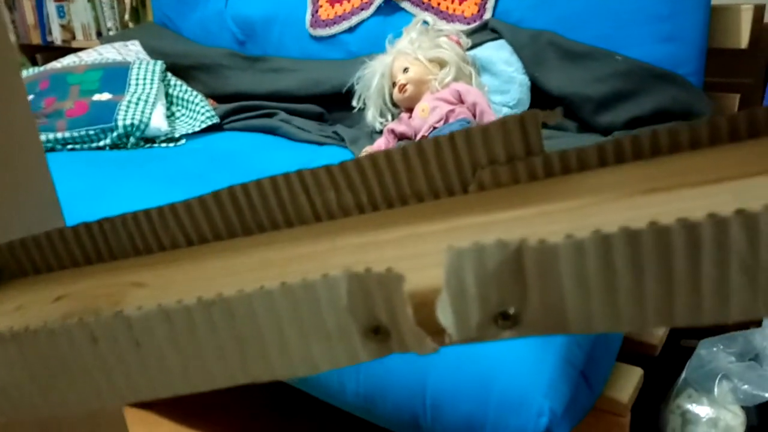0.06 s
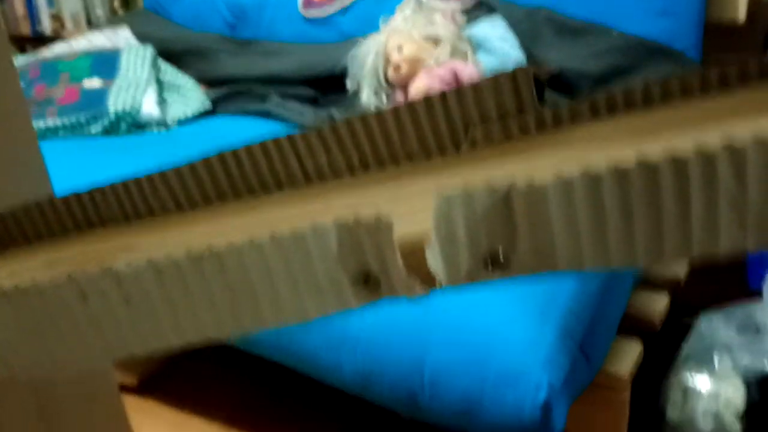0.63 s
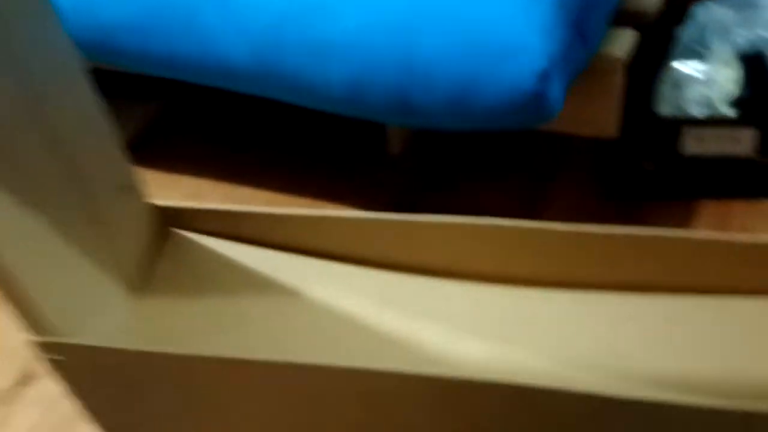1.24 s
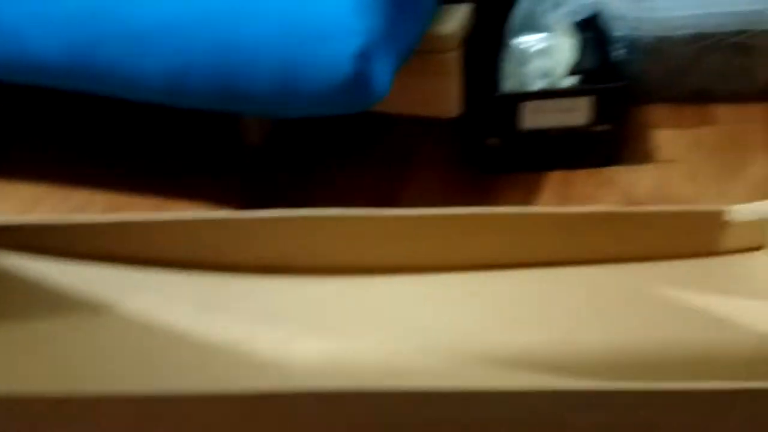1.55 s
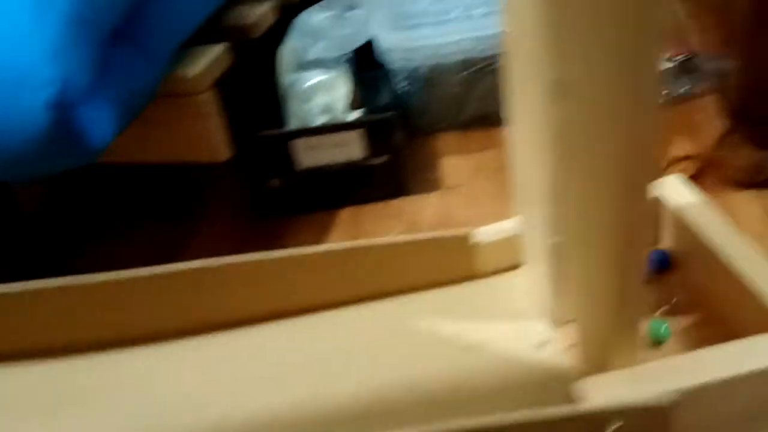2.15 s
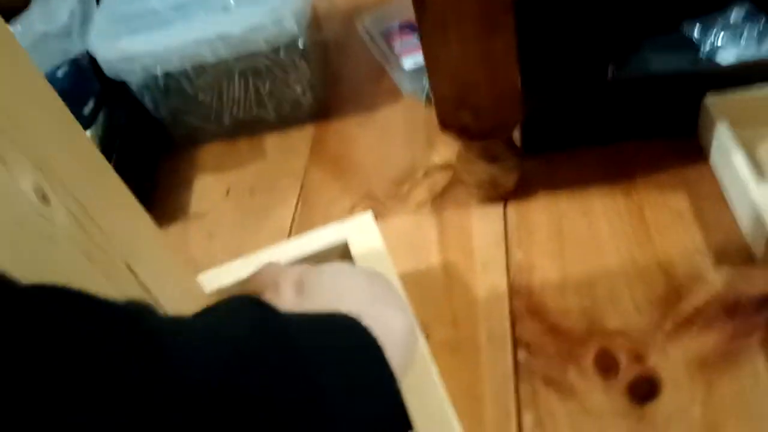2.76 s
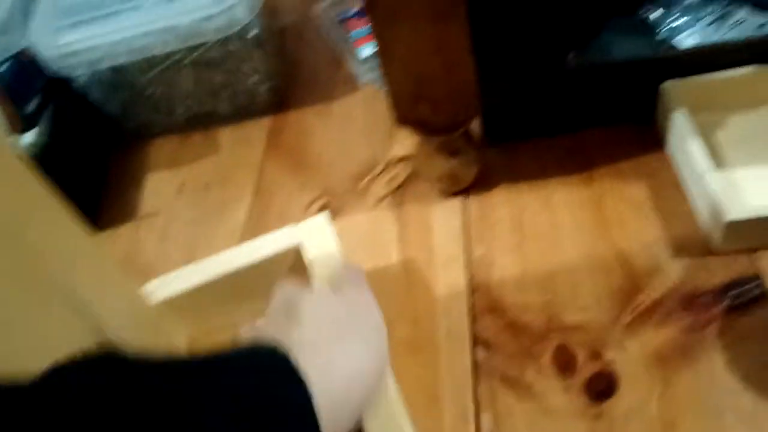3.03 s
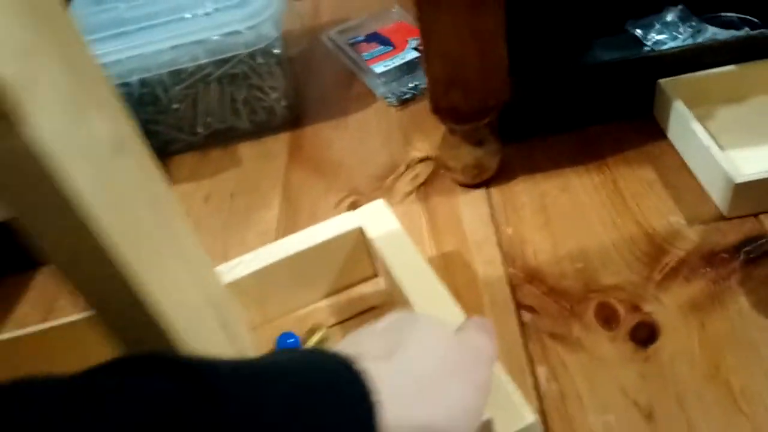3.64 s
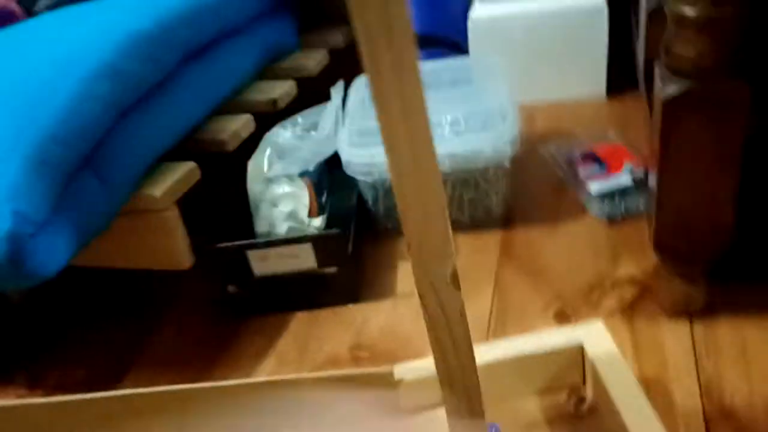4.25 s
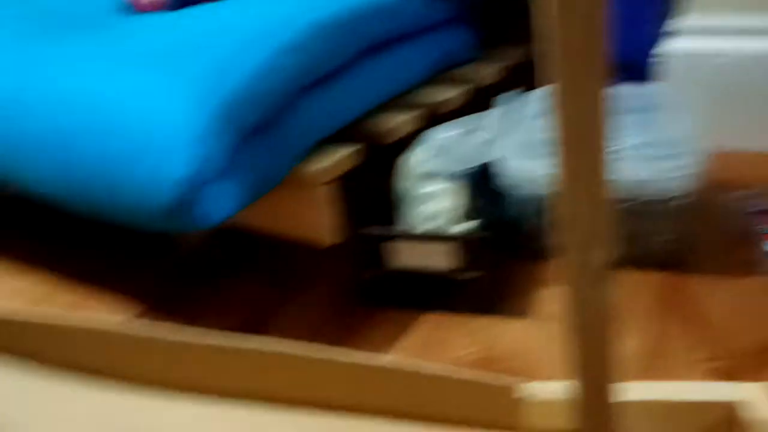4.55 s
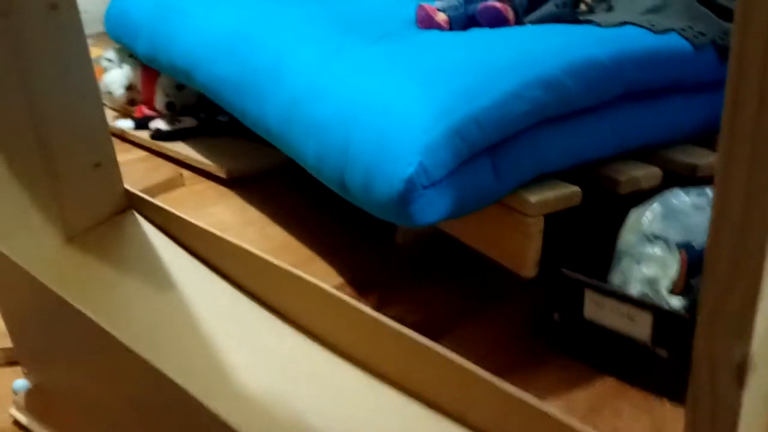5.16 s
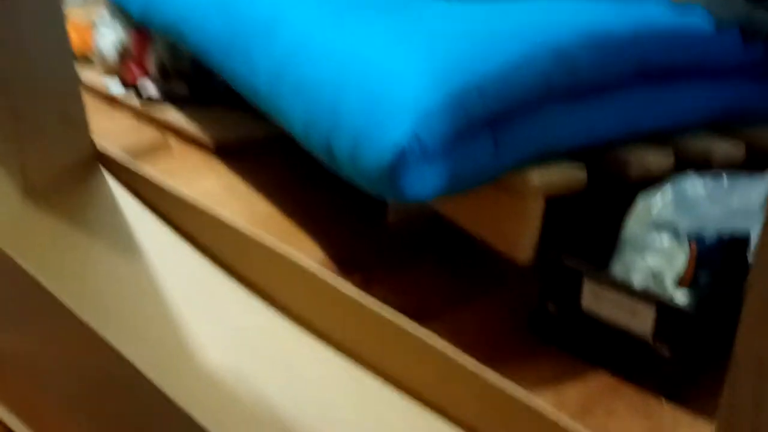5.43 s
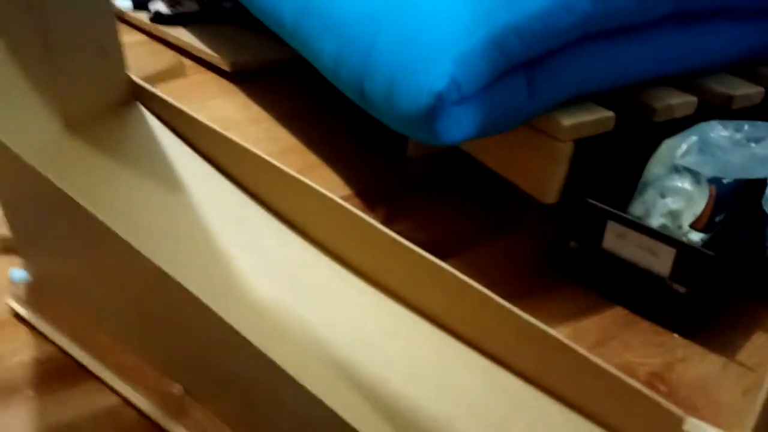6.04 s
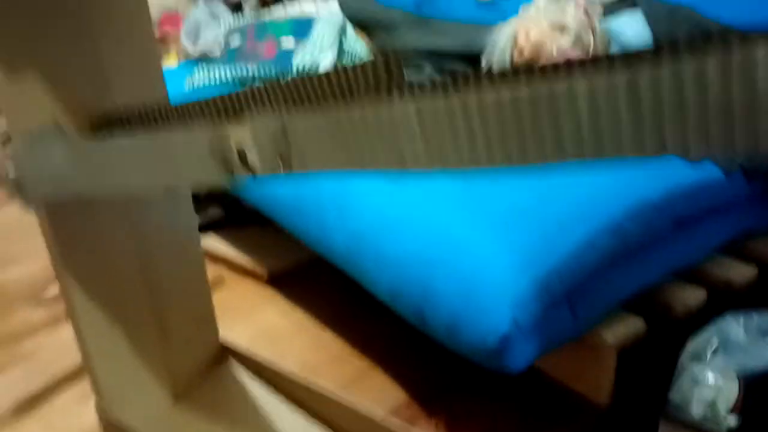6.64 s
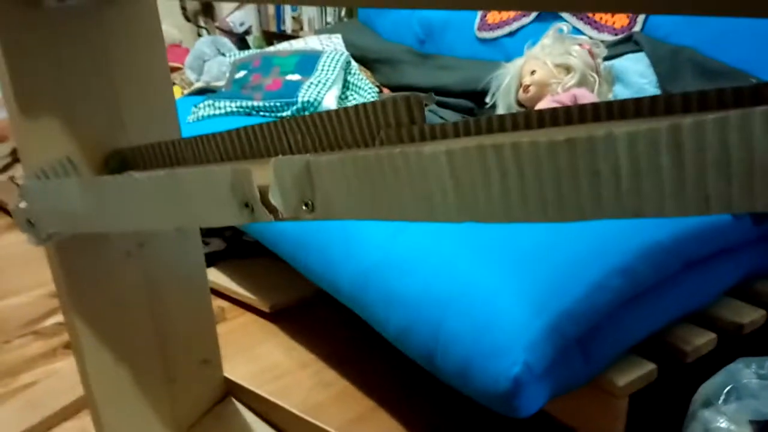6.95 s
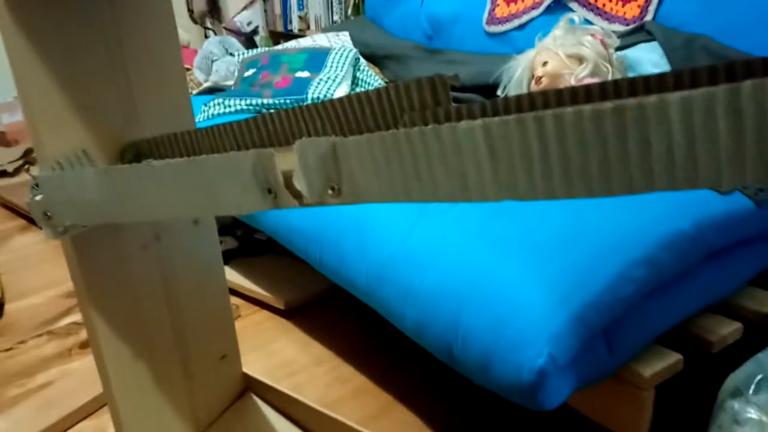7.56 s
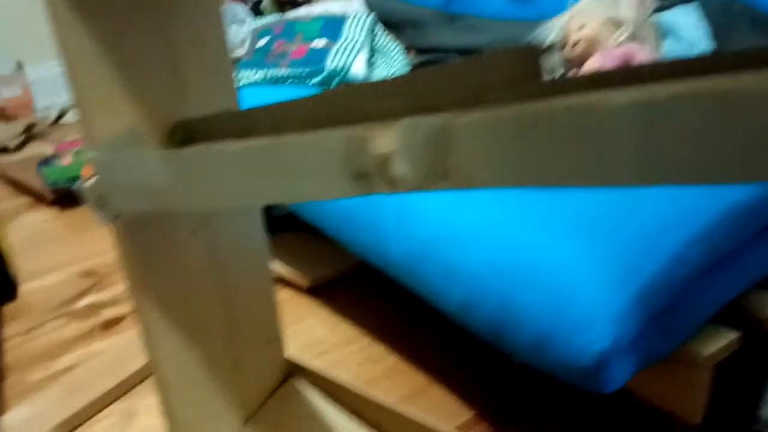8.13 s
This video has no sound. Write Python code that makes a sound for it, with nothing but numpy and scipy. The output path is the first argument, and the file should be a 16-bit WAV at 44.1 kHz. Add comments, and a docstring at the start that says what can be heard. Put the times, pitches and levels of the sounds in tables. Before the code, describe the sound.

Marbles rattle along wooden and cardboard tracks in a small room, click together as a hand gathers them, and roll once more.

```python
"""Glass marbles roll down a home-made run of boards and corrugated cardboard in a small room.
Bumps and knocks ring the wood's resonances; glass on glass clicks. As a clatter's hiss dies away, the
marbles rattle along the ramp and drop into a wooden tray, where a sleeved hand scrabbles them together.
Carried up with light taps and swishes of cloth, they are set on the top track, roll off and tumble
over its end. Jolts boom in the frame and floor; something hums low in the room."""
import sys
import numpy as np
from scipy import signal
from scipy.fft import rfft, irfft
from scipy.io import wavfile
from scipy.ndimage import map_coordinates

SR = 44100
rng = np.random.default_rng(int(sys.argv[2]) if len(sys.argv) > 2 else 0)


def dump(signal):
    """Clip the signal to [-1, 1] and save it as 16-bit WAV at the path in sys.argv[1]."""
    limited = np.clip(np.atleast_2d(signal).T, -1, 1)
    pcm = np.round(limited * 32767).astype(np.int16)
    wavfile.write(sys.argv[1], SR, pcm)


N = 369999
TIME = np.arange(N) / SR


def from_db(db):
    return 10 ** (np.asarray(db) / 20)


def unit_rms(x):
    return x / np.sqrt(np.mean(x ** 2) + 1e-20)


def band(x, low_hz, high_hz, order=2):
    """Causal band-pass."""
    sos = signal.butter(order, [low_hz, min(high_hz, .45 * SR)], "band", fs=SR, output="sos")
    return signal.sosfilt(sos, x)


def colour(x, points, size=4096):
    """Minimum-phase filter through (frequency [Hz], gain [dB]) points."""
    hz, db = np.transpose(points)
    grid_hz = np.maximum(np.fft.rfftfreq(size, 1 / SR), 1)
    gain = from_db(np.interp(np.log(grid_hz), np.log(hz), db))
    cepstrum = irfft(np.log(gain))
    cepstrum[1:size // 2] *= 2
    cepstrum[size // 2 + 1:] = 0
    response = irfft(np.exp(rfft(cepstrum)))
    return signal.oaconvolve(np.atleast_2d(x), response[None], axes=1)[:, :x.shape[-1]]


def wide_noise(size, apart_hz=750):
    """Stereo noise, alike in the bass, unrelated in the treble."""
    mid, side = rng.standard_normal((2, size))
    side = signal.sosfilt(signal.butter(1, apart_hz, "high", fs=SR, output="sos"), side)
    return unit_rms(mid + side * [[1], [-1]])


def add(out, time_s, sound):
    start = max(round(time_s * SR), 0)
    out[:, start:start + sound.shape[1]] += sound[:, :N - start]


def envelopes(curve, fade_s=.004):
    """One gain per dB column, over the curve's span, with faded ends."""
    times_s, *columns_db = np.transpose(curve)
    t = np.arange(times_s[0], times_s[-1], 1 / SR)
    fade = np.clip(np.minimum(t - t[0], t[-1] - t) / fade_s, 0, 1)
    return [fade * from_db(np.interp(t, times_s, db)) for db in columns_db]


def fluttering_noise(curve, shape, flutter_db, gain_db):
    """Coloured noise whose level flutters about a curve."""
    gain, = envelopes(curve)
    flutter = unit_rms(band(rng.standard_normal(len(gain)), 3.5, 70))
    noise = colour(wide_noise(len(gain)), shape) * from_db(flutter_db * flutter)
    out = np.zeros((2, N))
    add(out, curve[0][0], gain * unit_rms(noise))
    return from_db(gain_db) * out


# (time [s], level [dB]); table levels throughout are before each source's gain_db
CLATTER_TAIL_LEVELS = [(0, -27.5), (.05, -36.5), (.12, -49), (.3, -83)]
# (frequency [Hz], gain [dB])
CLATTER_TAIL_COLOUR = [(800, 0.5), (2000, 2.5), (5500, 4.5), (7000, -9.5), (10000, -13), (15000, -34)]


def clatter_tail():
    """The bright hiss of a clatter dies away as the roll begins."""
    return fluttering_noise(CLATTER_TAIL_LEVELS, CLATTER_TAIL_COLOUR, flutter_db=-0.7, gain_db=5.0)


# (frequency [Hz], level [dB])
HUM_TONES = [(118.4, -54.5), (209.9, -58)]
# background noise, with a faint rubbing whistle near 4.4 kHz: (frequency [Hz], gain [dB])
ROOM_COLOUR = [(15, -42.5), (25, -28.5), (87, -15.5), (102, -11.5), (123, -5.5), (149, -13.5), (217, -17),
               (242, -20), (416, -33.5), (677, -41), (3250, -44.5), (4370, -29.5), (7110, -49.5),
               (14800, -41.5), (16000, -52.5)]


def room_hum(noise_db=-54.5, waver=0.082):
    """Two slightly wavering low tones over faint room noise."""
    hum = 0
    for hz, db in HUM_TONES:
        tone = np.sqrt(2) * np.sin(2 * np.pi * hz * TIME)
        sidebands = unit_rms(band(rng.standard_normal(N), hz - 9, hz + 9))
        hum += from_db(db) * (tone + waver * sidebands)
    return hum + from_db(noise_db) * unit_rms(colour(wide_noise(N), ROOM_COLOUR))


# left microphone port behind right: (time [s], lag [ms])
LEFT_LAG = [(0, 0.15), (1.3, 0.31), (1.6, -0.32), (2.2, -0.16), (2.7, -0.23), (3.8, -0.27), (4.2, 0.047),
            (6.6, 0.019), (7.8, -0.094), (8.39, -0.24)]


def contact(time_s, t60_s, spike, hold_s=0.0023, size=5000):
    """One impact: a spike, then dense waves that hold briefly and decay; one port hears it later."""
    decay_s = np.maximum(np.arange(size) / SR - hold_s, 0)
    ring = wide_noise(size) * from_db(-60 * decay_s / t60_s)
    ring /= np.sqrt(np.sum(ring ** 2) / 2)
    ring[:, 0] += spike
    lag = round(np.interp(time_s, *np.transpose(LEFT_LAG)) * SR / 1000)
    return np.array([np.roll(ring[0], max(lag, 0)), np.roll(ring[1], max(-lag, 0))])


def wood(x, modes, swings_db):
    """A board passes everything and rings at its modes, each weighted by the point of contact."""
    out = x.copy()
    for (hz, width_hz, db), swing_db in zip(modes, swings_db):
        radius = np.exp(-np.pi * width_hz / SR)
        numerator = np.array([1, 0, -1]) * (1 - radius ** 2) / 2
        denominator = [1, -2 * radius * np.cos(2 * np.pi * hz / SR), radius ** 2]
        out += signal.lfilter(numerator, denominator, from_db(db + swing_db) * x)
    return out


def wander(x, share, turns_per_s=14):
    """Resonances drift by a share of their pitch as the marble travels."""
    size = x.shape[1]
    steps = np.arange(size)
    turns = rng.standard_normal(60)
    drift = np.interp(steps * turns_per_s / SR, np.arange(len(turns)), turns)
    position = np.clip(steps + np.cumsum(share * (drift - drift.mean())), 0, size - 1)
    return np.array([map_coordinates(channel, [position], order=3) for channel in x])


def rolling(curve, shape, modes, bumps_per_s, uneven_db, hiss, drift, gain_db, node_swing_db=2.5):
    """Marbles cross small uneven bumps, each a tiny tap on the board."""
    rumble_gain, grit_gain = envelopes(curve)
    size, start_s = len(rumble_gain), curve[0][0]
    bumps = (rng.random(size) < bumps_per_s / SR) * rng.standard_normal(size)
    bumps = unit_rms(bumps * from_db(uneven_db * np.minimum(rng.exponential(1, size), 3)))
    taps = signal.oaconvolve(bumps[None], contact(start_s, t60_s=0.02, spike=1.34), axes=1)[:, :size]
    # each mode swells and fades as the marble crosses its nodes
    node_rates_hz = [2.5 * np.sqrt(hz / 1000) for hz, _, _ in modes]
    swings_db = [node_swing_db * np.sin(2 * np.pi * (rate_hz * TIME[:size] + rng.random()))
                 for rate_hz in node_rates_hz]
    drive = colour(unit_rms(taps) + hiss * wide_noise(size), shape)
    board = wander(wood(drive, modes, swings_db), drift)
    rumble = unit_rms(band(board, 91, 1480, order=3))
    grit = unit_rms(band(board, 1530, 13000, order=3))
    out = np.zeros((2, N))
    add(out, start_s, rumble_gain * rumble + grit_gain * grit)
    return from_db(gain_db) * out


def crack_level(ring_db, hardness, soft_db=-21, hard_db=7.5):
    """Harder contacts crack louder relative to their ring."""
    return ring_db + np.interp(hardness, [0, 1], [soft_db, hard_db])


def bouncing(table, thud_db, loss_db, softening, max_hops, hop_ratio=0.75, settled_s=.006):
    """Blows of a marble that rebounds ever sooner, weaker and softer."""
    blows = []
    for time_s, db, hz, hardness, hop_s in table:
        for _ in range(max_hops + 1):
            blows.append((time_s, db, hz, db + thud_db, crack_level(db, hardness)))
            if hop_s < settled_s:
                break
            time_s += hop_s
            db -= loss_db
            hardness -= softening
            hop_s *= hop_ratio
    return blows


def at_level(x, db):
    """Set the rms of the first 20 ms."""
    return from_db(db) * x / np.sqrt(np.mean(x[:, :SR // 50] ** 2))


def knocks(blows, modes, t60_s, spike, spread, thud_hz, crack_hz, gain_db, spot_db=5.5):
    """Each blow flexes the board (thud), rings it at the blow's own pitch, and cracks if hard."""
    out = np.zeros((2, N))
    for time_s, ring_db, ring_hz, thud_db, crack_db in blows:
        impact = contact(time_s, t60_s, spike)
        board = wood(impact, modes, spot_db * rng.standard_normal(len(modes)))
        # a shorter, harder contact spreads wider and higher
        hardness = np.interp(crack_db - ring_db, [-22, -1], [0, 1])
        band_ratio = 1 + spread * (0.78 + 0.64 * hardness)
        top_hz = np.interp(hardness, [0, 1], [2900, 7400])
        board = signal.sosfilt(signal.butter(5, top_hz, fs=SR, output="sos"), board)
        ring = at_level(band(board, ring_hz / band_ratio, ring_hz * band_ratio), ring_db)
        thud = at_level(band(board, *thud_hz), thud_db)
        crack = at_level(band(board, *crack_hz, order=3), crack_db)
        add(out, time_s, ring + thud + crack)
    return from_db(gain_db) * out


# (time [s], ring level [dB], ring pitch [Hz], hardness [0-1], first hop [s] or 0)
RAMP_KNOCKS = [(.3278, -22, 1730, 0.6, 0), (.3698, -21.5, 2160, 0.4, 0.01),
               (.4635, -21, 1750, 0.62, 0.00024), (.582, -30, 1190, 0, 0),
               (.6089, -21.5, 1650, 0.79, 0.0038), (.673, -32, 2000, 0.25, 0),
               (.7064, -19, 1550, 0.4, 0.0013), (.8262, -18, 2100, 0.68, 0),
               (.8558, -19.5, 1580, 0.6, 0.0006), (.8835, -22, 1900, 0.5, 0),
               (.9048, -23, 1200, 0.67, 0.00069), (.9135, -19.5, 1360, 0.15, 0.00044),
               (.9205, -16.5, 1600, 0, 0.0031), (1.0225, -32, 1500, 0.12, 0), (1.083, -29.5, 1590, 0.2, 0),
               (1.1422, -25, 1900, 0.59, 0.00085), (1.1926, -20, 1900, 0.74, 0.027),
               (1.283, -17, 2050, 0.67, .03), (1.369, -24, 1990, 0.6, 0), (1.3785, -27, 1300, 0.64, 0.0029),
               (1.5505, -25.5, 1740, .72, 0), (1.6061, -20.5, 1960, 0.93, 0),
               (1.6391, -21.5, 2001, .85, 0.0021), (1.6652, -23, 1780, 0.77, 0.00083),
               (1.6855, -30, 1600, 0.35, 0.014), (1.7328, -22.5, 1574, 0.27, 0.0014),
               (1.7584, -20.5, 1890, 0.82, 0.002), (1.7905, -22.5, 1700, .65, .028),
               (1.8332, -25, 1720, 0.82, 0), (1.8713, -26.5, 1530, .1, 0.0047), (1.9605, -38, 1600, 0, 0)]
# (frequency [Hz], width [Hz], gain [dB])
RAMP_MODES = [(250, 45, -2), (370, 40, -3), (530, 25, -1), (660, 45, 1), (810, 50, 2), (910, 70, 4),
              (1385, 70, 4), (1510, 70, 5), (1700, 70, 1), (1950, 90, 1), (2130, 70, 5), (2510, 90, 2),
              (2850, 100, 5), (3600, 200, -2), (4400, 150, 0)]
# (time [s], rumble level [dB], grit level [dB])
RAMP_ROLL = [(0, -35.5, -46), (0.27, -33, -43), (0.48, -35.5, -39.5), (0.9, -39.5, -43.5),
             (1.26, -47, -43.5), (1.47, -55, -52.5), (1.73, -50, -35.5), (1.93, -52, -65), (2.1, -93, -49)]
# (frequency [Hz], gain [dB])
RAMP_ROLL_COLOUR = [(80, -25), (150, -18), (240, -6.5), (330, -10), (470, -12), (560, -6), (760, -4),
                    (900, -.5), (1050, -1.5), (1250, -8), (2000, -10.5), (3500, -22.5), (6000, -27),
                    (10000, -66.5)]


def ramp_run():
    """Marbles roll and hop down the ramp."""
    blows = bouncing(RAMP_KNOCKS, thud_db=-22.5, loss_db=2.5, softening=0.16, max_hops=3)
    rattle = knocks(blows, RAMP_MODES, t60_s=0.033, spike=0.46, spread=0.31,
                    thud_hz=(191.6, 489), crack_hz=(2610, 4680), gain_db=-2.5)
    roll = rolling(RAMP_ROLL, RAMP_ROLL_COLOUR, RAMP_MODES, bumps_per_s=900,
                   uneven_db=3.0, hiss=0.42, drift=.035, gain_db=1.5)
    return rattle + roll


def glass(contacts, t60_s, spike, width, sparkle_db, gain_db):
    """Marble on marble: a very short pitched tick with treble sparkle."""
    out = np.zeros((2, N))
    for time_s, db, hz in contacts:
        impact = contact(time_s, t60_s, spike, hold_s=0)
        tick = band(impact, hz / (1 + width), hz * (1 + width))
        sparkle = from_db(sparkle_db) * band(impact, 7360, 11400)
        add(out, time_s, at_level(tick + sparkle, db))
    return from_db(gain_db) * out


# (time [s], level [dB], pitch [Hz])
GLASS_CLICKS = [(0.39, -31, 6750), (0.9124, -36.5, 6400), (1.0583, -51.5, 6595), (1.355, -38, 6500),
                (1.801, -56, 6445), (2.128, -38, 6106), (2.147, -44, 6600), (2.348, -52, 4740),
                (2.493, -52, 4270), (2.5067, -30.5, 6300), (2.5937, -28, 5600), (2.613, -37, 6200),
                (2.686, -39.5, 6100), (2.7043, -34.5, 6800), (2.7327, -36, 6600), (2.7626, -33, 7040),
                (2.8779, -36.5, 6500), (2.9337, -36, 6500), (2.9492, -33, 7040), (2.9946, -29, 5950),
                (3.04, -28.5, 6050), (3.0745, -24.5, 5800), (3.1, -27.5, 5970), (3.1162, -26, 5560),
                (3.1348, -30, 5700), (3.1555, -28, 6500), (3.165, -34.5, 6200), (3.261, -35, 6300),
                (3.2849, -44.5, 6300), (3.3104, -32, 6100), (3.3313, -35, 6200), (3.3775, -30, 6340),
                (3.398, -26.5, 6750), (3.4725, -27, 5700), (3.4843, -28, 6500), (3.4992, -24, 5540),
                (3.5437, -28.5, 6200), (3.582, -27.5, 5530), (3.594, -24, 5500), (3.627, -29, 5470),
                (3.658, -31, 6300), (3.666, -31, 5900), (3.677, -29.5, 5300), (3.7329, -37, 5800),
                (3.8018, -46, 4650), (5.2435, -52, 6450), (6.6616, -42, 6420), (6.7609, -48, 6360),
                (7.07, -44, 6160), (7.6798, -50, 6360), (7.834, -30, 6360), (7.8727, -26.5, 6400),
                (7.8805, -31.5, 6800), (7.8946, -37, 6400), (8.023, -32, 6550), (8.0567, -31, 6550),
                (8.1295, -24, 5330), (8.2223, -45, 7000), (8.2373, -33.5, 8000), (8.3176, -39, 4600),
                (8.3251, -43, 4800)]


def marble_clicks():
    """Distinct collisions between marbles, all along the run."""
    return glass(GLASS_CLICKS, t60_s=0.021, spike=0.35, width=0.32, sparkle_db=-6.5, gain_db=2.5)


def strokes(table, shape, attack_s, release_s, fade_db, flutter_db, gain_db):
    """Each movement's noise swells, holds and dies away."""
    out = np.zeros((2, N))
    for start_s, length_s, db in table:
        end_s, quiet_db = start_s + length_s, db - fade_db
        curve = [(start_s - attack_s, quiet_db), (start_s, db), (end_s, db),
                 (end_s + release_s, quiet_db)]
        out += fluttering_noise(curve, shape, flutter_db, gain_db)
    return out


# (start [s], length [s], level [dB])
SLEEVE_BRUSHES = [(2.06, 0.036, -48.5), (2.2, 0.41, -52), (2.48, 0.014, -60), (3.77, 0.39, -47.5),
                  (4.3, 0.26, -57), (4.8, 0.16, -54), (5.31, 0.15, -48.5), (5.6, 0.38, -65),
                  (6.6, 0.27, -53)]
# (frequency [Hz], gain [dB])
SLEEVE_COLOUR = [(200, 7), (700, 1.5), (2500, 3.5), (5000, 11), (6300, 2.5), (8000, -11.5), (12000, -9),
                 (15000, -25)]


def sleeve_brushes():
    """Cloth catches and slips as the arm moves."""
    return strokes(SLEEVE_BRUSHES, SLEEVE_COLOUR, attack_s=.09, release_s=0.2,
                   fade_db=9.5, flutter_db=2.0, gain_db=4.0)


# (time [s], ring level [dB], ring pitch [Hz], thud level [dB], hardness [0-1])
TRAY_THUDS = [(2.113, -27, 1060, -27.5, 0.67), (2.157, -27.5, 1400, -48, 0.22), (2.1953, -30, 1370, -46, 0),
              (2.221, -58, 900, -34, 0.2), (2.4132, -32.5, 1417, -33.5, 0.75), (2.431, -49, 900, -37, 0.2),
              (3.635, -39, 696, -31, 0), (3.648, -34, 650, -35, 0.05), (3.658, -34, 610, -32, 0),
              (3.822, -21, 1320, -43, 0.51), (4.05, -26.5, 1530, -49, 0), (4.0989, -37, 1310, -38, 0),
              (4.2114, -26, 1490, -36, 0.67), (4.2673, -34, 1190, -33, 0.61)]
# (frequency [Hz], width [Hz], gain [dB])
TRAY_MODES = [(260, 100, 0), (450, 50, 0), (670, 45, 1), (860, 50, -1), (1250, 70, -2), (1520, 45, 3.5),
              (1730, 55, 4.5), (1930, 40, 0), (2133, 30, -2), (2950, 200, -7), (4266, 120, -3),
              (5270, 100, -8)]


def tray_thuds():
    """Thuds on the tray: marbles land and bounce, and a hand bumps the wood."""
    blows = [(time_s, db, hz, thud_db, crack_level(db, hardness))
             for time_s, db, hz, thud_db, hardness in TRAY_THUDS]
    return knocks(blows, TRAY_MODES, t60_s=0.063, spike=0.47, spread=0.37,
                  thud_hz=(146, 523), crack_hz=(2860, 5260), gain_db=-1.5)


# (start [s], length [s], level [dB])
FRAME_BOOMS = [(2.12, 0.35, -44.5), (2.52, 0.09, -38.5), (3.17, 0.1, -53.5), (3.42, 0.016, -51),
               (3.63, 0.034, -37.5), (7.81, 0.05, -41.5), (7.97, 0.018, -43), (8.1, 0.25, -51)]
# (frequency [Hz], gain [dB])
BOOM_COLOUR = [(20, -28), (45, -38.5), (85, 5), (130, -2), (220, -9.5), (400, -12.5), (1000, -64)]


def frame_booms():
    """Frame and floor boom when jolted."""
    return strokes(FRAME_BOOMS, BOOM_COLOUR, attack_s=.05, release_s=0.24,
                   fade_db=23.0, flutter_db=4.5, gain_db=2.5)


def chance_contacts(spans, per_s, level_db, spread_db):
    """Unevenly spaced touches of crowded marbles: (time [s], level [dB])."""
    slots_s = np.concatenate([np.arange(start_s, end_s, 1 / per_s) for start_s, end_s in spans])
    return [(slot_s + rng.uniform(-.5, .5) / per_s, level_db + spread_db * rng.uniform(-1, 1))
            for slot_s in slots_s]


def jostling(contacts, ring_hz, thud_db, hardness, scatter_octaves):
    """Small blows of crowded marbles on wood, scattered in pitch."""
    blows = []
    for time_s, db in contacts:
        hz = ring_hz * 2 ** (scatter_octaves * rng.uniform(-1, 1))
        blows.append((time_s, db, hz, db + thud_db, crack_level(db, hardness)))
    return blows


# (time [s], ring level [dB], ring pitch [Hz], hardness [0-1], first hop [s] or 0)
TRAY_KNOCKS = [(2.5071, -17, 1750, 0.7, 0), (2.545, -26, 1700, 0.38, 0.0029),
               (2.6034, -23, 1650, 0.14, 0.00048), (2.7012, -20.5, 1700, 0.83, .009),
               (2.7366, -20, 1650, .62, 0.00094), (2.7626, -22, 1700, 0.85, 0.0015),
               (2.81, -24, 1650, 0.8, 0), (2.8384, -20.5, 1600, 0.65, 0.0018), (2.8779, -27, 1650, 0.74, 0),
               (2.9541, -21, 1700, 0.76, .014), (3.0227, -17.5, 1600, 0.5, 0.00037),
               (3.0405, -22.5, 1550, 0.5, .008), (3.0743, -19.5, 1600, .93, 0),
               (3.1005, -17.5, 1800, .72, .012), (3.135, -22, 1800, 0.8, 0.0011),
               (3.1545, -19, 1800, .71, .009), (3.183, -25.5, 1700, 0.4, 0.0033),
               (3.249, -17.5, 1800, 0.64, .014), (3.2955, -20.5, 1700, 0.6, .007),
               (3.3104, -22, 1700, 0.75, 0.00039), (3.3494, -21.5, 1650, .75, 0),
               (3.3982, -22, 1700, 0.66, 0), (3.409, -21, 1200, 0.1, 0.0015),
               (3.419, -22, 1900, 0.1, 0.00021), (3.4416, -23.5, 1550, 0.36, .008),
               (3.4842, -19.5, 1800, 0.7, 0.00084), (3.5, -25.5, 1800, 0.4, 0),
               (3.5212, -21.5, 1750, 0.7, .022), (3.5611, -21, 1850, 0.76, 0.0032),
               (3.6051, -24.5, 1900, 0.6, 0.0011), (3.62, -17.5, 1800, 0.2, 0.001),
               (3.6839, -21, 1850, 0.5, .012)]
# (start [s], end [s])
STIR_SPANS = [(2.7, 2.98), (3.05, 3.2), (3.3, 3.72)]
# (time [s], rumble level [dB], grit level [dB])
TRAY_ROLL = [(2.48, -51, -45), (2.53, -30, -39), (2.65, -35, -37), (2.8, -33, -35), (2.97, -29, -24),
             (3.012, -36.5, -39), (3.17, -27.5, -32.5), (3.23, -34.5, -37.5), (3.36, -36.5, -34),
             (3.62, -23.5, -23), (3.79, -45, -58), (3.85, -37, -58)]
# (frequency [Hz], gain [dB])
TRAY_ROLL_COLOUR = [(80, -22), (250, -10), (550, -6), (1000, -7), (1300, 0), (1700, 9), (2800, 0),
                    (6000, -13), (10000, -17), (15000, -32.5)]


def tray_scrabble():
    """A hand stirs the marbles and scoops them against the tray walls."""
    blows = bouncing(TRAY_KNOCKS, thud_db=-23, loss_db=2.0, softening=0.11, max_hops=1)
    touches = chance_contacts(STIR_SPANS, per_s=14, level_db=-33.5, spread_db=-1.0)
    blows += jostling(touches, ring_hz=1700, thud_db=-7.5, hardness=0.72, scatter_octaves=0.22)
    rattle = knocks(blows, TRAY_MODES, t60_s=0.043, spike=0.36, spread=0.34,
                    thud_hz=(152.3, 645), crack_hz=(2860, 5300), gain_db=-3.0)
    roll = rolling(TRAY_ROLL, TRAY_ROLL_COLOUR, TRAY_MODES, bumps_per_s=400,
                   uneven_db=0.0, hiss=0.45, drift=.03, gain_db=-3.0)
    return rattle + roll


# (start [s], length [s], level [dB])
SLEEVE_SWISHES = [(4.3, 0.052, -49.5), (4.48, 0.09, -49), (5.33, 0.092, -51), (5.9, 0.03, -59)]
# (frequency [Hz], gain [dB])
SWISH_COLOUR = [(1000, -30), (3000, -6.5), (5000, 8.5), (6300, -6.5), (8000, -34), (10000, -16),
                (12000, -1), (15000, -12)]


def sleeve_swishes():
    """Brisk cloth friction as the arm is drawn back and raised."""
    return strokes(SLEEVE_SWISHES, SWISH_COLOUR, attack_s=0.055, release_s=0.14,
                   fade_db=24, flutter_db=2.0, gain_db=10.0)


# (time [s], ring level [dB], ring pitch [Hz], hardness [0-1], first hop [s] or 0)
FRAME_TAPS = [(4.6373, -33, 1330, .1, .047), (4.903, -38.5, 1200, .1, 0), (5.042, -52, 1300, .05, 0),
              (5.1551, -37.5, 1400, .2, .011), (5.181, -46, 1450, .25, .008), (5.199, -47, 1400, .2, .022),
              (5.32, -47, 1500, .25, .02), (5.388, -43, 1550, .35, .05), (5.5082, -30, 1600, .7, 0),
              (5.5233, -28, 1600, .73, .0095)]
# (frequency [Hz], width [Hz], gain [dB])
FRAME_MODES = [(625, 18, 16), (800, 45, 8), (1045, 65, 7), (1275, 60, -3), (1490, 60, 4), (1690, 70, 7),
               (1880, 80, 6), (2080, 60, 1), (3870, 140, 2), (4290, 120, 2)]


def frame_taps():
    """Light taps ring the frame as the marbles are carried up."""
    blows = bouncing(FRAME_TAPS, thud_db=-19, loss_db=7.0, softening=.05, max_hops=1)
    return knocks(blows, FRAME_MODES, t60_s=.04, spike=0.33, spread=0.34,
                  thud_hz=(273, 686), crack_hz=(2860, 4640), gain_db=3.0)


# (time [s], ring level [dB], ring pitch [Hz], hardness [0-1], first hop [s] or 0)
TRACK_KNOCKS = [(6.6258, -23.5, 1550, .77, 0), (6.6535, -27, 1500, .5, 0), (6.6616, -23, 1500, .48, .0105),
                (6.694, -30, 1400, .5, 0), (6.7609, -27, 1400, .4, 0), (6.8548, -27.5, 1450, .68, .018),
                (6.9248, -21, 1600, .6, .029), (7.0011, -23, 1450, .9, .0335), (7.1908, -35, 1400, .4, 0),
                (7.2745, -35, 1400, .6, 0), (7.3255, -27.5, 1600, .8, 0), (7.3405, -30, 1600, .8, 0),
                (7.6105, -29, 1300, .8, .0275)]
# (frequency [Hz], width [Hz], gain [dB])
TRACK_MODES = [(175, 30, 10), (495, 55, 2), (646, 32, 11), (745, 32, 8), (835, 45, 8), (1105, 40, 11),
               (1262, 25, 5), (1375, 36, 2), (1560, 70, 2), (1700, 50, 6), (1905, 45, 8), (2840, 70, 1),
               (3330, 190, -3), (4070, 140, 0)]
# (time [s], rumble level [dB], grit level [dB])
TRACK_ROLL = [(7.06, -40, -34), (7.14, -47, -50.5), (7.31, -43, -56.5), (7.47, -38.5, -40),
              (7.8, -37.5, -33.5)]
# (frequency [Hz], gain [dB])
TRACK_ROLL_COLOUR = [(80, -7), (180, -5.5), (330, -3), (650, -9), (950, -5.5), (1110, .5), (1300, -4),
                     (1600, -6), (1900, -13), (2300, -8), (4000, -14), (5500, -19), (7000, -34),
                     (10000, -55)]


def top_track():
    """Marbles are set on the top track, bounce and roll off."""
    blows = bouncing(TRACK_KNOCKS, thud_db=-15.5, loss_db=3, softening=0.15, max_hops=2)
    rattle = knocks(blows, TRACK_MODES, t60_s=0.036, spike=0.4, spread=0.54,
                    thud_hz=(520, 960), crack_hz=(2860, 4600), gain_db=-0.5)
    roll = rolling(TRACK_ROLL, TRACK_ROLL_COLOUR, TRACK_MODES, bumps_per_s=600,
                   uneven_db=1.0, hiss=0.3, drift=.012, gain_db=3.5)
    return rattle + roll


def tumbling(table, thud_db, loss_db_per_octave):
    """Low blows flex the track most: the thud weakens as the pitch rises above the first fall's."""
    first_hz = table[0][2]
    blows = []
    for time_s, db, hz, hardness in table:
        loss_db = loss_db_per_octave * np.log2(hz / first_hz)
        blows.append((time_s, db, hz, db + thud_db - loss_db, crack_level(db, hardness)))
    return blows


def grazing(contacts, low_hz, high_hz):
    """Crowded marbles graze each other at scattered pitches."""
    return [(time_s, db, low_hz * (high_hz / low_hz) ** rng.random()) for time_s, db in contacts]


# (time [s], ring level [dB], ring pitch [Hz], hardness [0-1])
DROP_KNOCKS = [(7.8044, -18.5, 778, 0.44), (7.8101, -22.5, 666, .1), (7.838, -24.5, 1470, .3),
               (7.859, -26, 1500, 0.89), (7.874, -21, 1580, 0.6), (7.8941, -21.5, 1300, 0.77),
               (7.9245, -19.5, 1320, 0.93), (7.9343, -22, 1250, 0.6), (7.963, -28, 1800, 0.92),
               (7.997, -17, 2220, 0.24), (8.036, -19.5, 2050, 0.62), (8.068, -25, 1860, 0.97),
               (8.074, -18.5, 1330, 0.68), (8.083, -21, 1300, 0.5), (8.092, -25.5, 1400, 0.75),
               (8.121, -29, 1290, 0), (8.13, -23.5, 2500, 1), (8.148, -27, 2200, 0.1),
               (8.181, -27.5, 1900, 0.86), (8.2223, -20, 1370, 0.65), (8.26, -22.5, 1120, 0.75),
               (8.3088, -20, 860, 0.54), (8.348, -17, 2200, 0.56), (8.367, -28, 1850, 0.84)]
# (frequency [Hz], width [Hz], gain [dB])
DROP_MODES = [(336, 70, 11), (430, 70, 2), (730, 100, 5), (910, 70, 0), (1095, 70, 4), (1290, 65, 6),
              (1590, 90, 1), (2090, 100, 4), (2330, 90, 0), (3160, 260, -9), (4110, 300, -4)]
# (time [s], rumble level [dB], grit level [dB])
DROP_ROLL = [(7.81, -40.5, -35.5), (8.05, -34, -25), (8.19, -35.5, -26), (8.207, -37, -28),
             (8.213, -54, -59), (8.24, -30, -28), (8.39, -33.5, -29.5)]
# (frequency [Hz], gain [dB])
DROP_ROLL_COLOUR = [(80, -9), (200, -30), (400, 1.5), (1300, 1), (2300, 2.5), (4000, 3), (6500, -13),
                    (10000, -21), (15000, -22)]
# (start [s], end [s])
CROWD_SPANS = [(7.87, 8.2), (8.24, 8.37)]


def end_drop(pan_db=0.66):
    """Marbles crowd and tumble over the track's end, slightly to the left."""
    blows = tumbling(DROP_KNOCKS, thud_db=-4, loss_db_per_octave=19.0)
    rattle = knocks(blows, DROP_MODES, t60_s=0.043, spike=0.66, spread=0.27,
                    thud_hz=(215, 624), crack_hz=(2860, 4800), gain_db=-1.5)
    roll = rolling(DROP_ROLL, DROP_ROLL_COLOUR, DROP_MODES, bumps_per_s=900,
                   uneven_db=1.0, hiss=0.15, drift=.04, gain_db=0.0)
    touches = chance_contacts(CROWD_SPANS, per_s=55, level_db=-34, spread_db=10)
    grazes = grazing(touches, low_hz=2550, high_hz=5900)
    crunch = glass(grazes, t60_s=0.018, spike=0.45, width=0.14, sparkle_db=-21, gain_db=-1.5)
    return (rattle + roll + crunch) * from_db([[pan_db], [-pan_db]])


def room(x, wet_db, low_t60_s=0.27, high_t60_s=0.23, onset_s=0.0039, split_hz=2500, size=20000):
    """Reflections of a small furnished room; the treble dies first."""
    t = np.arange(size) / SR
    low = band(wide_noise(size), 160, split_hz, order=1) * from_db(-60 * t / low_t60_s)
    high = band(wide_noise(size), split_hz, 8800, order=1) * from_db(-60 * t / high_t60_s)
    tail = (low + high) * (1 - np.exp(-(t / onset_s) ** 2))
    tail /= np.sqrt(np.sum(tail ** 2) / 2)
    return x + from_db(wet_db) * signal.oaconvolve(x, tail, axes=1)[:, :N]


def scene():
    """Marbles with room reflections, plus booms, cloth, clatter tail and hum."""
    ramp = ramp_run()
    thuds = tray_thuds()
    scrabble = tray_scrabble()
    taps = frame_taps()
    track = top_track()
    drop = end_drop()
    clicks = marble_clicks()
    marbles = (room(ramp, wet_db=-13) + room(scrabble + drop, wet_db=-11)
               + room(thuds + taps, wet_db=-15) + room(track, wet_db=-7.5)
               + room(clicks, wet_db=-8.5))
    return marbles + frame_booms() + sleeve_brushes() + sleeve_swishes() + clatter_tail() + room_hum()


# (frequency [Hz], left gain [dB], right gain [dB])
PORT_COLOURS = [(102, 1, 1), (512, 7, 6.5), (1060, 0.5, 3), (1480, -3.5, 1.5), (2463, -0.5, 2),
                (4340, -6, -9.5), (4880, -8.5, -6.5), (5980, 0, -5.5), (6660, 2, -7), (9100, -8.5, -24.5),
                (13300, -21, -21), (14900, 3, -4)]


def record(dry, cutoff_hz=15700):
    """Each microphone port has its own colour; a steep low-pass cuts the top."""
    ports = np.array(PORT_COLOURS)
    left = colour(dry[0], ports[:, [0, 1]])
    right = colour(dry[1], ports[:, [0, 2]])
    low_pass = signal.ellip(10, .3, 80, cutoff_hz, fs=SR, output="sos")
    return signal.sosfilt(low_pass, np.vstack([left, right]))


dry = scene()
out = record(dry)
dump(out)
```